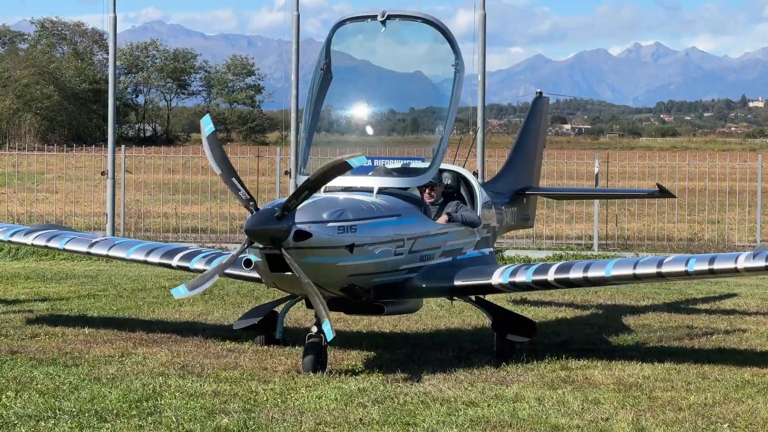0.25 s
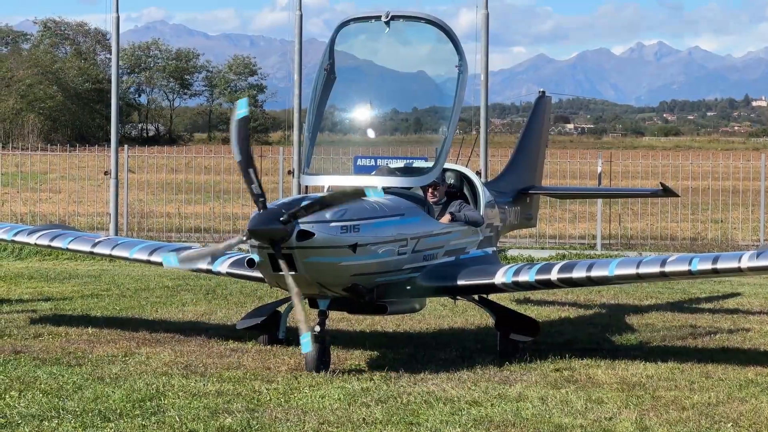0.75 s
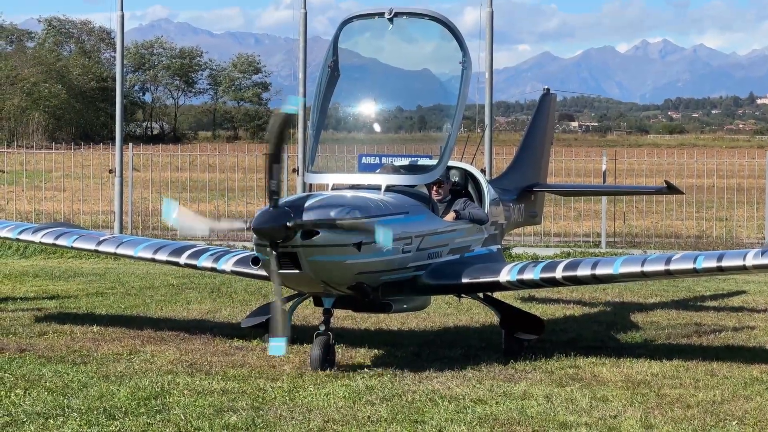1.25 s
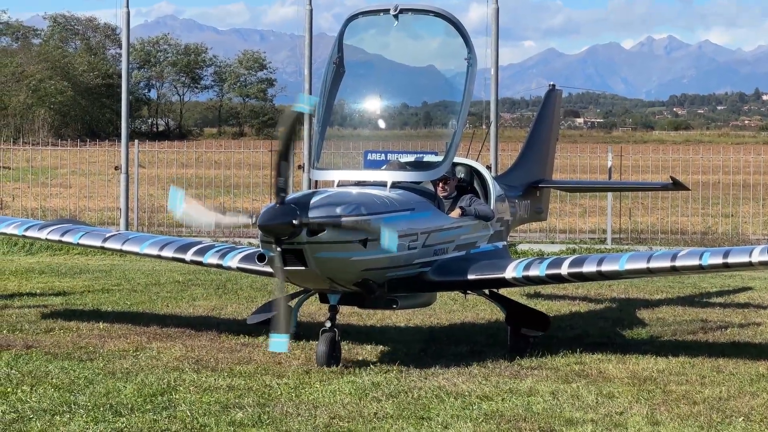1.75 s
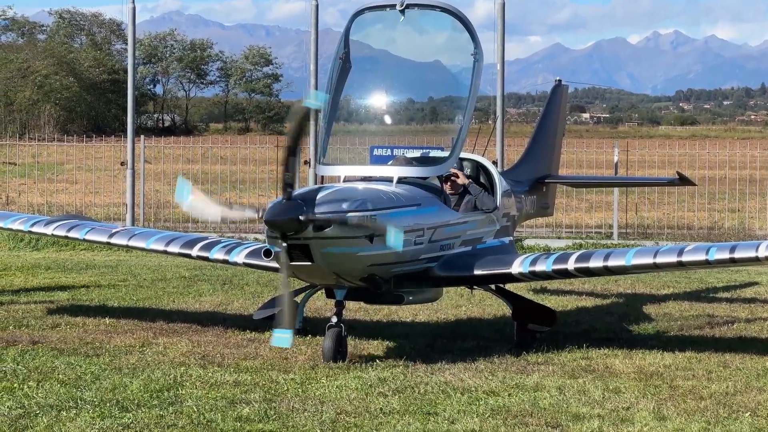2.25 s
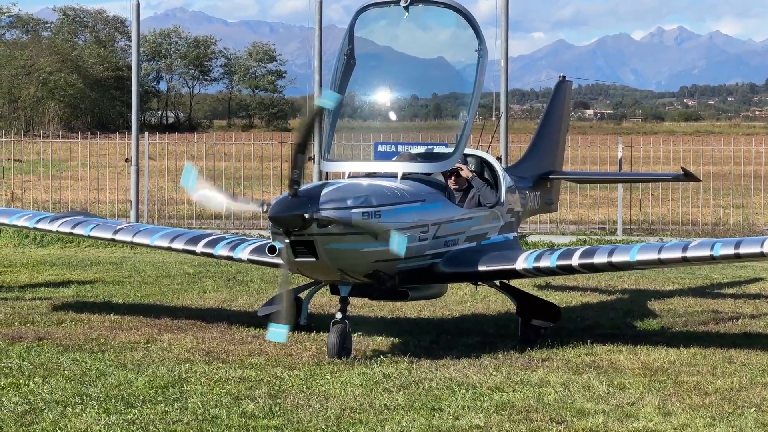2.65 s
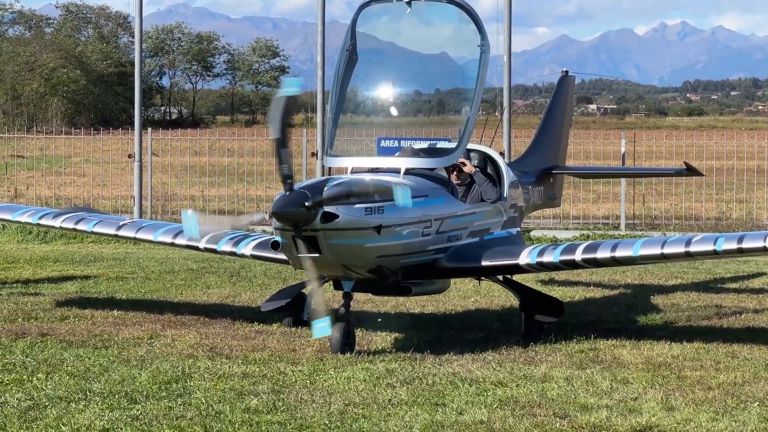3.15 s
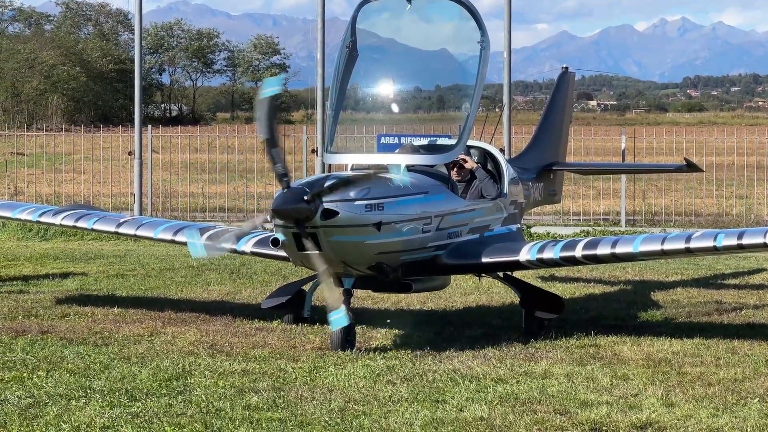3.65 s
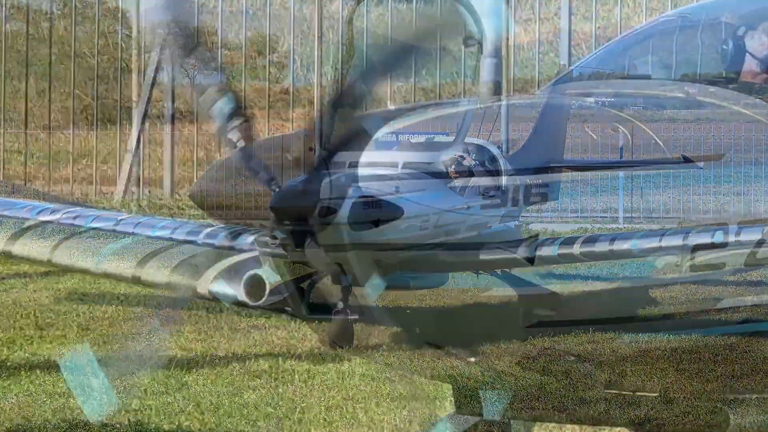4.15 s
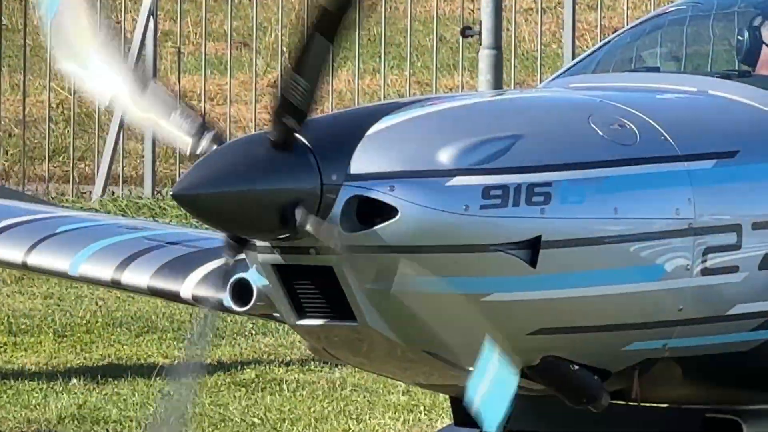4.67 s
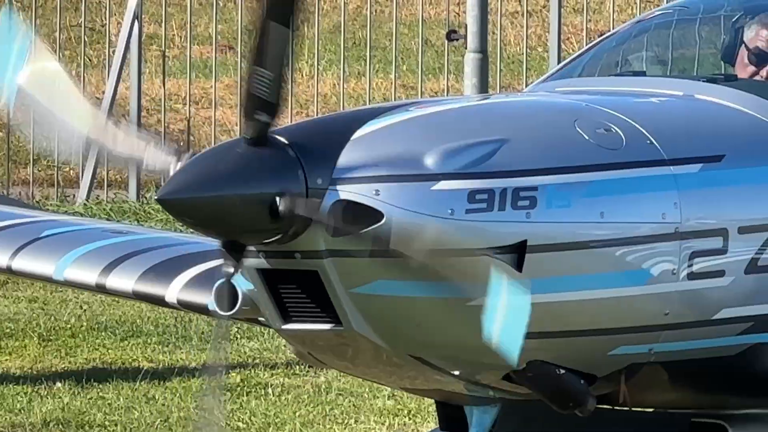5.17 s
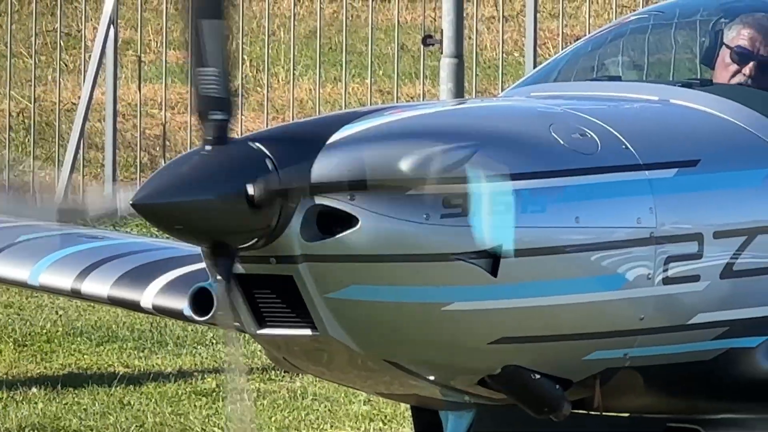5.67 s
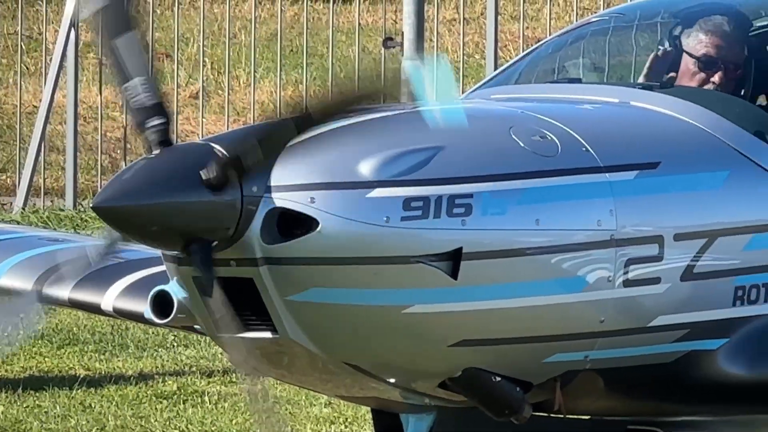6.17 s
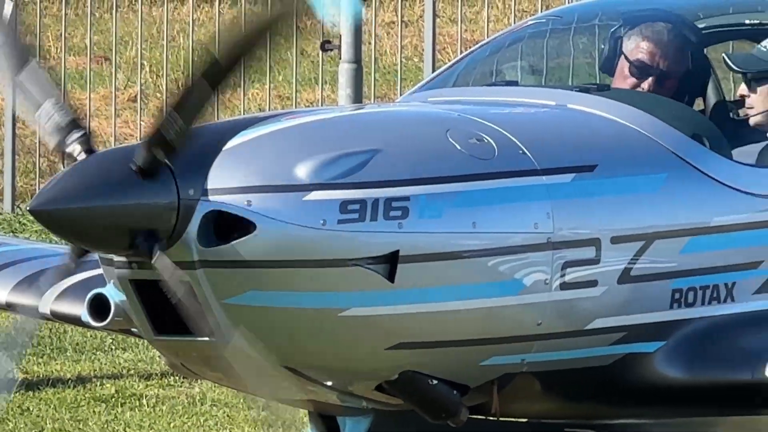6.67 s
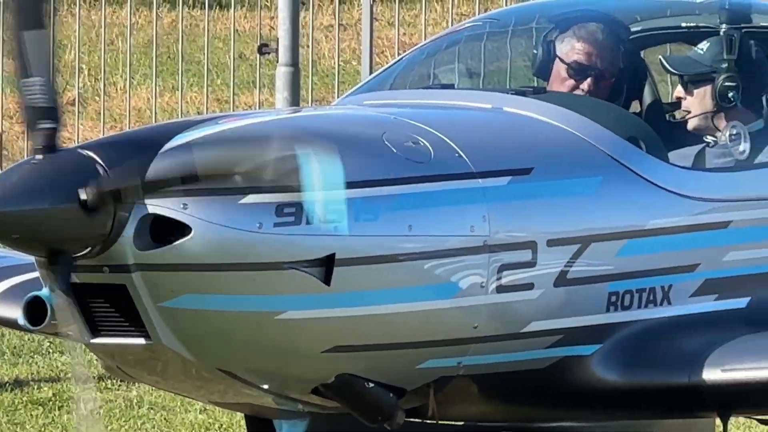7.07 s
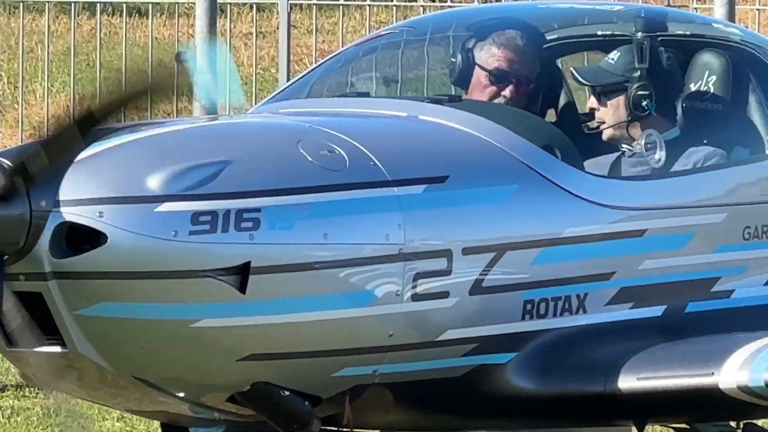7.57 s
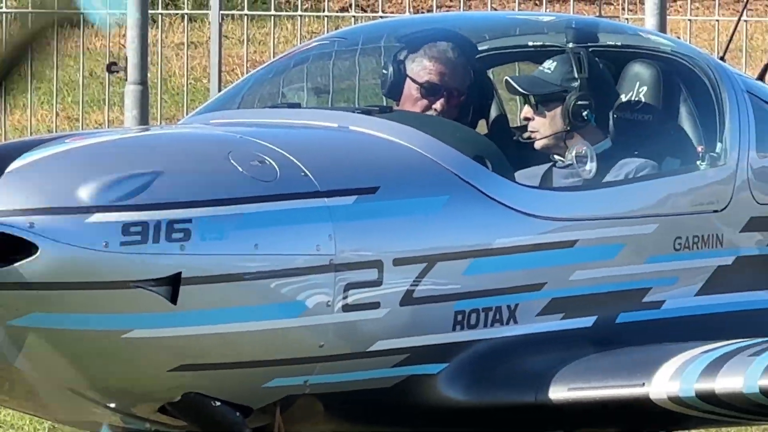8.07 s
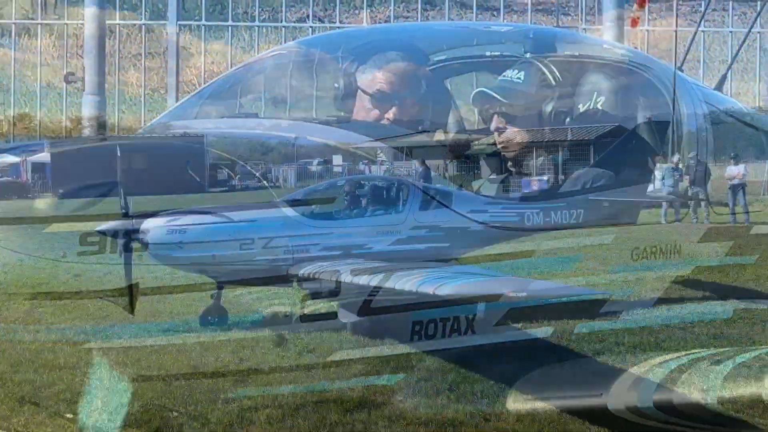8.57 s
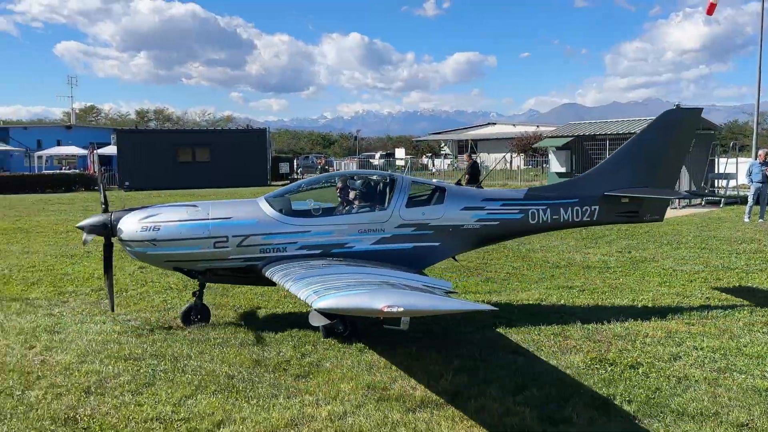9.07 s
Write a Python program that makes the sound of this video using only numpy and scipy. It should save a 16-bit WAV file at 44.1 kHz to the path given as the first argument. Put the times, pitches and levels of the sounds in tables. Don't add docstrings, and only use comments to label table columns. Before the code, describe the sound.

A starter whines and clanks, a small propeller plane's engine coughs, catches and runs up, then settles to a rattly idle before a faster drone.

```python
import sys
import numpy as np
from scipy import signal
from scipy.fft import rfft, irfft, next_fast_len
from scipy.io import wavfile
from scipy.ndimage import uniform_filter1d, map_coordinates

SR = 44100
rng = np.random.default_rng(int(sys.argv[2]) if len(sys.argv) > 2 else 0)


def makeup_ratio(level_db):
    decades = np.asarray(level_db, float) / 20
    return 10 ** decades


def bounce(signal):
    frames = np.transpose(np.atleast_2d(signal))
    limited = np.clip(frames, -1, 1)
    pcm = np.round(limited * 32767).astype(np.int16)
    wavfile.write(sys.argv[1], SR, pcm)


N = 411453
T = np.arange(N) / SR

# [t/s, peak level/dB]
FAR_BEATS = [
    (0.0, -53),
    (0.0894, -38),
    (0.1994, -39),
    (0.3082, -37),
    (0.4205, -39),
]
# [f/Hz, width/Hz, level/dB]
FAR_BODY = [(559, 37, 4.5), (804, 180, -0.5), (2100, 110, -7), (2910, 110, -14), (5400, 260, -12.5),
            (6200, 140, -16)]
# [f/Hz, spectral level/dB]
FAR_NOISE = [(15, -38), (60, 3), (120, -7), (250, -12.5), (450, -15), (800, -15), (1150, -13), (2000, -21),
             (3300, -20.5), (5000, -33.5), (7000, -36), (8800, -33), (11500, -85), (15000, -64)]

# [f/Hz, spectral level/dB]
CRANKING_NOISE = [(15, -50), (60, 1), (120, -3.5), (250, -0.5), (450, -16), (800, -17), (1150, -17),
                  (2000, -23), (3300, -23.5), (5000, -28), (7000, -28.5), (8800, -27), (11500, -51),
                  (15000, -40)]
# [t/s, level/dB]
PINION_LOAD = [(.52, -14), (.54, -0.5), (.575, -11.5), (.635, -13), (.65, 0.5), (1.05, 1.5), (1.13, -9.5),
               (1.36, -34)]
# [t/s, level/dB]
COLD_PUFFS = [(.535, -12.5), (.645, -12), (.705, -2), (.75, -6), (.885, 0.5), (.99, 0.5), (1.06, -10),
              (1.145, -0.5), (1.23, -8)]
# [t/s, peak level/dB]
CLANKS = [(0.5377, -13), (0.614, -25), (0.651, -9.5), (0.69, -12.5), (0.7642, -15), (0.8335, -17),
          (0.8824, -13), (0.9294, -15), (1.0394, -23), (1.1156, -23), (1.1814, -28)]
# [f/Hz, width/Hz, level/dB]
HOUSING = [(815, 310, -5.5), (1380, 29, -6), (2080, 150, -2.5), (3180, 91, 1), (4030, 140, -4),
           (5340, 140, -5), (6200, 370, -6)]
CHUG_DB, PIPE_DB, TURNING_DB = -12.5, -14.5, -27
WHINE_DB, WHINE_DB_PER_LOAD_DB = -29.5, .15
GRIND_DB, TOOTH_SCATTER_DB = -23, 2

# [t/s, peak level/dB, ring f/Hz]
COUGHS = [(0.703, 4.5, 88.8), (0.73, 1.5, 313), (0.748, 6, 85), (0.768, -2, 144), (0.892, 5, 100),
          (0.92, -6, 92.5), (1.151, -10, 240), (1.182, -5, 232), (1.221, -5, 207), (1.244, -12, 195),
          (1.304, -19, 212)]
# [t/s, peak level/dB]
SILENCER_BOOMS = [(2.548, -25), (2.832, -29), (3.549, -17), (3.579, -12), (5.049, -24), (5.438, -7),
                  (6.227, -12), (6.611, -17), (7.289, -31)]

# [t/s, firing f/Hz, effort level/dB]
RUN_UP = [(0.95, 42.6, -17), (1.12, 52.01, -13), (1.2, 58.65, -10.5), (1.28, 66.26, -3), (1.4, 70.78, -1.5),
          (1.58, 74.4, -0.5), (1.95, 79.2, 1.5), (2.3, 79.13, 0), (2.65, 79.23, -2.5), (3.4, 79.46, -5.5),
          (3.8, 79.4, -4.5)]
IDLE = [(4.0, 59.1, 0), (8.9, 59.1, 0)]
TAXI = [(8.4, 84.35, 0), (8.85, 86.96, 0.25), (9.33, 89.7, 0.98)]
# [in from t/s, in by t/s, out from t/s, out by t/s]
VIEW_SPANS = [
    (0.947, 1.145, 3.8, 4.4),
    (3.896, 4.393, 8.35, 8.9),
    (8.337, 8.89, 9.9, 10.5),
]
# [f/Hz, spectral level/dB]
FRONT_NOISE = [(15, -50), (60, -7), (120, 2.5), (250, -2.5), (450, -10), (800, -13), (1150, -18.5),
               (2000, -21), (3300, -21.5), (5000, -28.5), (7000, -29.5), (8800, -25), (11500, -46),
               (15000, -34.5)]
CLOSE_NOISE = [(15, -54), (60, -5.5), (120, -9.5), (250, -14), (450, -19.5), (800, -21), (1150, -21.5),
               (2000, -26), (3300, -26), (5000, -33.5), (7000, -35.5), (8800, -33), (11500, -52),
               (15000, -41)]
BESIDE_NOISE = [(15, -39), (60, -9), (120, -5.5), (250, -15), (450, -11.5), (800, -5), (1150, -7.5),
                (2000, -17), (3300, -22.5), (5000, -26), (7000, -25), (8800, -24), (11500, -42.5),
                (15000, -29.5)]
# [exhaust note, 2nd, 3rd, rasp, hiss, rumble: level/dB]
FRONT_DB = (-10.5, -25, -32, -28, -37, -23.5)
CLOSE_DB = (-15.5, -23, -35.5, -32, -43, -27)
BESIDE_DB = (-13, -25, -34, -31, -37, -26)
LAYER_GROWTH = (0.87, 0.19, 0.1, 0.44, 0.083, 0.32)
OVERTONE_PHASES = [
    (-2.0, 4.0),
    (-.1, 2.9),
    (-1.1, 3.1),
]
# [t/s, level/dB]
ODD_FIRINGS = [(2.561, -3), (2.85, -10), (3.5, -29), (3.559, 11), (5.445, 3), (6.235, 8), (6.6, -24),
               (7.3, 6), (7.68, -3)]
# [f/Hz, width/Hz, level/dB]
EXHAUST_PIPE = [(147.9, 6.4, 6.5), (201.4, 15.4, 13.5)]
STUMBLE_S, STUMBLE_FOR_S, STUMBLE_DB = 1.24, 0.015, -30
BLADES_PER_FIRING = 4 / 2 / 2.54
AIR_DB_PER_OCTAVE = 11.5

# [f/Hz, width/Hz, level/dB]
GEAR_CASING = [(1885, 260, 1.5), (2380, 300, -2), (3420, 710, -8)]
# [t/s, peak level/dB]
SINGLE_LASH = [(4.382, -26), (4.452, -23), (4.5094, -19), (4.585, -24), (4.7211, -25), (4.7885, -22),
               (4.9067, -20.5), (5.3308, -21.5), (5.4679, -31), (5.8077, -22), (6.091, -21), (6.1469, -22),
               (6.3455, -21), (6.4113, -22), (6.6094, -26), (6.703, -18.5), (6.982, -21), (7.0244, -22),
               (7.3197, -19), (7.429, -26), (7.5657, -24), (7.632, -29), (7.9069, -29), (7.9748, -22),
               (8.0306, -25), (8.2466, -29), (8.3992, -24)]
LASH_FROM_S, LASH_TO_S, CYCLE_S = 4.384, 8.45, 4 / 59.07
LASH_DB, LASH_SCATTER_DB, LASH_JITTER_S = -24.5, 0.5, 0.0043

# [t/s, level/dB]
LEFT_LEAN = [(0, -30), (.7, -7), (1.3, -8), (2.1, -22), (2.7, -17), (3.6, -40)]
# [f/Hz, level/dB]
SPREAD = [(60, 1), (200, -3), (400, -8), (800, 0.5), (1150, -2), (1350, -21)]
EDGE_HZ, EDGE_SLIDES_S, EDGE_HZ_PER_S, EDGE_LAST_HZ = 520, .6, 320, 42

# [f/Hz, phase/rad]
STEREO_PHASE = [(6700, 0), (6900, .5), (7400, 1.3), (7700, 3.3), (8550, 3.3), (9000, 1.9), (9500, 1.4),
                (10100, .9), (10600, 0), (13000, 0), (13600, -.9), (14500, -1.5), (15700, -2.0)]
# [f/Hz, ratio]
SIDE_LOBE = [(2400, 0), (3000, .26), (3700, .26), (4100, .15), (4700, .08), (5000, 0)]
# [from t/s, to t/s, readiness]
OPENINGS = [
    (0, .95, 1.2),
    (3.25, 3.9, 1.05),
    (8.38, 9.4, 3.2),
]
SHUT = -.27
TOP_HZ = 15830


def unit(x):
    return x / np.sqrt(np.mean(x ** 2) + 1e-20)


def along(points, hz):
    f, value = np.transpose(points)
    return np.interp(np.log(hz + 1), np.log(f + 1), value)


def curves(rows):
    s, *columns = np.transpose(rows)
    return [np.interp(T, s, column) for column in columns]


def filtered(x, response):
    m = next_fast_len(N + 8192)
    return irfft(rfft(x, m) * response(np.fft.rfftfreq(m, 1 / SR)), m)[..., :N]


def modes(rows, turn=-1):
    def response(f):
        total = 0
        for k, (centre, width, db) in enumerate(rows):
            damping = 1j * f * width
            total = total + turn ** k * makeup_ratio(db) * damping / (centre * centre - f * f + damping)
        return total
    return response


def noise(spectrum, low_hz, high_hz, gate=1):
    def band(f):
        edges = (1 + (low_hz / (f + 1)) ** 6) * (1 + (f / high_hz) ** 6)
        return makeup_ratio(along(spectrum, f)) / np.sqrt(edges)
    return unit(filtered(gate * rng.standard_normal(N), band))


def per_turn(turns):
    return map_coordinates(rng.standard_normal(int(turns[-1]) + 9), [turns], order=3)


def bursts(rows, rise, fall):
    t = np.arange(SR // 8) / SR
    marks = np.zeros(N)
    for s, db, *_ in rows:
        marks[max(round(s * SR), 0)] = makeup_ratio(db)
    blow = np.exp(-t / fall) * (1 - np.exp(-t / rise))
    return np.abs(signal.fftconvolve(marks, blow)[:N])


def neighbour():
    def body(rows):
        ringing = unit(filtered(rng.standard_normal(N), modes(rows)))
        return unit(noise(FAR_NOISE, 460, 30000) + 1.34 * ringing)
    since = (T - .14) * 9.05 % 1
    swell = 0.5 + np.minimum(since / 0.3, 1) * np.minimum((1 - since) / 0.15, 1)
    chuff = makeup_ratio(4.5) * bursts(FAR_BEATS, 0.0013, 0.011) * body(FAR_BODY)
    intake = makeup_ratio(-48) * swell * body(FAR_BODY[:4])
    return chuff + intake + makeup_ratio(-40.0) * noise(FAR_NOISE, 44, 320)


def starter():
    load_db, = curves(PINION_LOAD)
    on = np.interp(T, [.525, .535, 1.31, 1.325], [0, 1, 1, 0])
    mesh_hz = np.interp(T, [.55, .7, .9, 1.05, 1.3], [1986, 1993, 2050, 2136, 2050])
    mesh_hz = mesh_hz + 50 * per_turn(30 * T)
    strands = 0
    for ratio, db in [(.93, -1), (1, 2), (1.06, -2)]:
        angle = 2 * np.pi * np.cumsum(ratio * mesh_hz) / SR
        strands = strands + makeup_ratio(db + 3.5 * per_turn(80 * T)) * np.sin(angle)
    blur = filtered(rng.standard_normal(N), lambda f: modes([(2070, 600, 0)])(f) ** 2)
    whine_db = WHINE_DB + WHINE_DB_PER_LOAD_DB * load_db + 2.5 * (T > 1.04)
    whine = makeup_ratio(whine_db) * unit(unit(strands) + .6 * unit(blur))
    teeth = makeup_ratio(TOOTH_SCATTER_DB * per_turn(110 * T))
    grind = makeup_ratio(GRIND_DB + load_db) * noise(CRANKING_NOISE, 300, 30000, teeth)
    cowling = modes([(874, 130, -4), (1440, 220, -2.5), (3330, 430, -7)], turn=0.8)
    grind = grind + filtered(grind, cowling)
    puffs = bursts(COLD_PUFFS, 0.0065, 0.062)
    leave = np.interp(T, [.92, 1.0], [1, .1])
    thuds = makeup_ratio(CHUG_DB) * puffs * (T > .69) + makeup_ratio(TURNING_DB) * (T > .575)
    chug = leave * thuds * noise(CRANKING_NOISE, 60, 168)
    pipe_tone = unit(filtered(noise(CRANKING_NOISE, 170, 340), modes([(244, 94, 0)])))
    pipe = makeup_ratio(PIPE_DB) * puffs * pipe_tone
    blows = bursts(CLANKS, 0.0029, 0.0054) * rng.standard_normal(N)
    return on * (whine + grind + chug + pipe) + makeup_ratio(16.5) * filtered(blows, modes(HOUSING))


def coughs():
    out, t = np.zeros(N), np.arange(SR // 8) / SR
    rise = 1 - np.exp(-t / 0.0014)

    def decaying(hz, t60):
        return np.sin(2 * np.pi * hz * t) * makeup_ratio(-60 * t / t60)
    for s, db, hz in COUGHS:
        ring = decaying(hz, 0.096) + .5 * decaying(400, 0.046)
        out[round(s * SR):][:len(t)] += makeup_ratio(db - 8.5) * ring * rise
    for s, db in SILENCER_BOOMS:
        out[round(s * SR):][:len(t)] += makeup_ratio(db + 1) * decaying(95, 0.14) * rise
    return out


def engine(rows, layers_db, span, colour, cowl, lean, bend, scatter_db, blade_db, swish, puff):
    hz, effort_db = curves(rows)
    layers = [db + grows * effort_db for db, grows in zip(layers_db, LAYER_GROWTH)]
    *note_db, rasp_db, hiss_db, rumble_db = layers
    stumble_db = STUMBLE_DB * np.exp(-.5 * ((T - STUMBLE_S) / STUMBLE_FOR_S) ** 2)
    note_db[0] = note_db[0] + stumble_db
    rumble_db = rumble_db + stumble_db
    air_db = AIR_DB_PER_OCTAVE * np.log2(hz / hz[-1])
    rasp_db, hiss_db = rasp_db + air_db, hiss_db + 0.51 * air_db

    firings = np.cumsum(hz) / SR
    odd_db = sum(db * np.exp(-.5 * ((T - s) * hz / 0.22) ** 2) for s, db in ODD_FIRINGS)
    cylinders_db = 1.0 * np.cos(2 * np.pi * firings / 4) + 0.15 * np.cos(2 * np.pi * firings / 2)
    size_db = scatter_db * per_turn(firings) + odd_db + cylinders_db
    angle = 2 * np.pi * firings + 0.14 * per_turn(firings)
    note_db += [note_db[2] - 5.5, note_db[2] - 10.0]
    lags = [0] + [lean - bend * k for k in range(4)]
    note = 0
    for k, db in enumerate(note_db):
        pipe_db = sum(gain * np.exp(-.5 * (((k + 1) * hz - c) / w) ** 2) for c, w, gain in EXHAUST_PIPE)
        level_db = db + pipe_db + size_db + 0.1 * k * per_turn(firings)
        note = note + makeup_ratio(level_db) * np.cos((k + 1) * angle + lags[k])

    blades = 2 * np.pi * BLADES_PER_FIRING * firings
    beat = 0
    for k, db in enumerate(blade_db):
        beat = beat + makeup_ratio(rasp_db + db + 2 * per_turn(firings / 8)) * np.cos((k + 1) * blades)

    pulsing_db = swish * np.cos(blades) + puff * np.cos(angle)
    rasp_gate = makeup_ratio(2.0 * pulsing_db + 0.73 * per_turn(firings / 3))
    rasp = makeup_ratio(rasp_db) * noise(colour, 393, 2010, rasp_gate)
    hiss_gate = makeup_ratio(pulsing_db + 0.11 * per_turn(firings / 3) + 0.97 * per_turn(3 * firings))
    hiss = makeup_ratio(hiss_db + 4.5) * noise(colour, 1670, 30000, hiss_gate)
    ringing = filtered(rasp + hiss, modes(cowl, turn=1))
    rumble = makeup_ratio(rumble_db) * noise(colour, 46, 304, makeup_ratio(1.2 * per_turn(firings / 4)))
    share = np.interp(T, span, [0, 1, 1, 0])
    direct = np.sqrt(2) * (note + beat) + rasp + hiss + ringing + rumble
    return direct * share, (rumble + 0.48 * rasp) * share


def gearbox():
    cycles = np.arange(LASH_FROM_S, LASH_TO_S, CYCLE_S)
    chance = rng.standard_normal((len(cycles), 2))
    regular_s = cycles + LASH_JITTER_S * chance[:, 0]
    regular_db = LASH_DB + LASH_SCATTER_DB * chance[:, 1]
    knocks = [*np.transpose([regular_s, regular_db]), *SINGLE_LASH]
    rattle = bursts(knocks, 0.0025, 0.014) * rng.standard_normal(N)

    def casing(f):
        return modes(GEAR_CASING)(f) / (1 + (f / 4500) ** 6) / (1 + (1400 / (f + 1)) ** 6)
    return makeup_ratio(8.0) * filtered(rattle, casing)


def wind_filter(sound, scattered):
    hz, t, z = signal.stft(np.array([sound, scattered]), SR, nperseg=2048)
    hz = hz[:, None]
    ratio = hz / np.clip(EDGE_HZ - EDGE_HZ_PER_S * (t - EDGE_SLIDES_S), EDGE_LAST_HZ, EDGE_HZ)
    lean = makeup_ratio(np.interp(t, *np.transpose(LEFT_LEAN))) * np.exp(-.5 * ((ratio - 1.65) / .4) ** 2)
    patches = uniform_filter1d(rng.standard_normal(ratio.shape), size=5, axis=0)
    patches = uniform_filter1d(patches, size=2, axis=1)
    passing = (unit(patches) > -.1) | (hz < 250)
    leaning = (lean + 0.028 * (hz < 330)) * z[0]
    scatter = passing * makeup_ratio(along(SPREAD, hz)) * z[1]
    side = (ratio > 1) * (leaning + scatter)
    return signal.istft(side, SR, nperseg=2048)[1][:N]


def scene():
    still = neighbour() + starter() + coughs()
    front, front_wash = engine(
        RUN_UP, FRONT_DB, VIEW_SPANS[0], FRONT_NOISE, [(880, 113, 2.0), (1320, 630, 1.5)],
        *OVERTONE_PHASES[0], scatter_db=0.7, blade_db=[-25, -18, -4.0, -7], swish=0.99, puff=0.27)
    close, close_wash = engine(
        IDLE, CLOSE_DB, VIEW_SPANS[1], CLOSE_NOISE, [(770, 144, 0.5), (1310, 100, -44)],
        *OVERTONE_PHASES[1], scatter_db=0.8, blade_db=[-23, -19, -26.5, -36], swish=0.27, puff=0.65)
    beside, beside_wash = engine(
        TAXI, BESIDE_DB, VIEW_SPANS[2], BESIDE_NOISE,
        [(1075.3, 540, -7.0), (1560, 320, -10), (3000, 430, 2), (5460, 720, -3)],
        *OVERTONE_PHASES[2], scatter_db=1.0, blade_db=[-20, -10, -22.0, -19], swish=0.91, puff=0.97)
    wash = makeup_ratio(-9.0) * front_wash + makeup_ratio(-11.5) * close_wash + makeup_ratio(-16.0) * beside_wash
    scattered = np.roll(wash, 1500) + makeup_ratio(-10) * np.roll(still, 300)
    sound = front + close + beside + gearbox() + still
    side = wind_filter(sound, scattered)
    return np.array([sound + side, sound - side])


def top_cut(x):
    return signal.sosfilt(signal.butter(12, 16590, fs=SR, output="sos"), x)


def record(dry):
    mid, side = (dry[0] + dry[1]) / 2, (dry[0] - dry[1]) / 2
    echoes_s = rng.uniform(.004, .03, 7)

    def half(hz):
        return np.clip(along(STEREO_PHASE, hz), -np.pi, np.pi) / 2

    def diffuse(hz):
        return .72 + .2 * sum(np.exp(-2j * np.pi * hz * s) for s in echoes_s)

    def band(hz):
        return (hz < TOP_HZ) / np.sqrt(1 + (44 / (hz + 1)) ** 8)
    ready = SHUT + sum(more * ((T >= start) & (T < end)) for start, end, more in OPENINGS)
    opened = uniform_filter1d(1.0 * (ready + .6 * per_turn(30 * T) > 0), size=300)
    side = side + filtered(mid, lambda hz: 1j * np.sin(half(hz)) * diffuse(hz))
    side = side + filtered(opened * mid, lambda hz: 1j * along(SIDE_LOBE, hz))
    mid = filtered(mid, lambda hz: np.cos(half(hz)))
    both = filtered(np.array([mid + side, mid - side]), band)
    both = both / (1 + np.abs(both / .92) ** 6) ** (1 / 6)
    return top_cut(both)


dry = scene()
out = record(dry)
bounce(out)
```